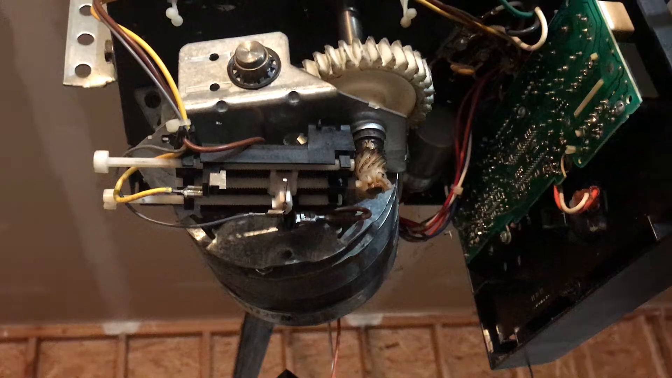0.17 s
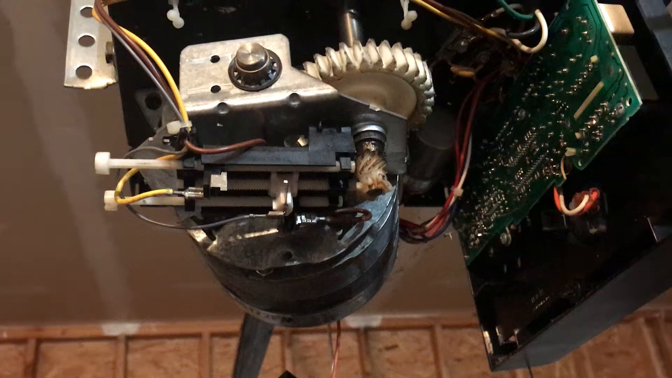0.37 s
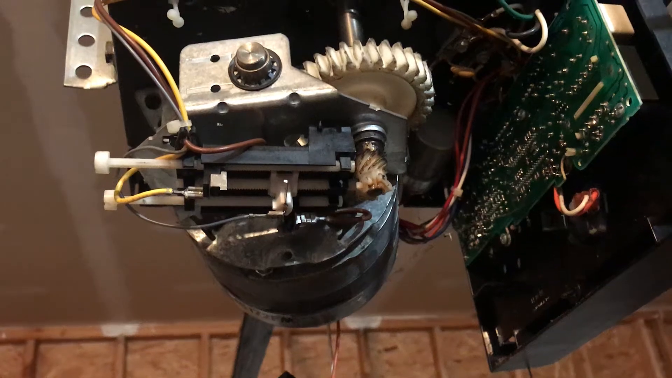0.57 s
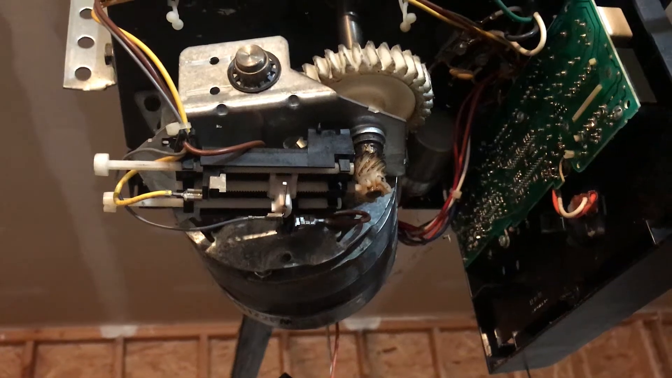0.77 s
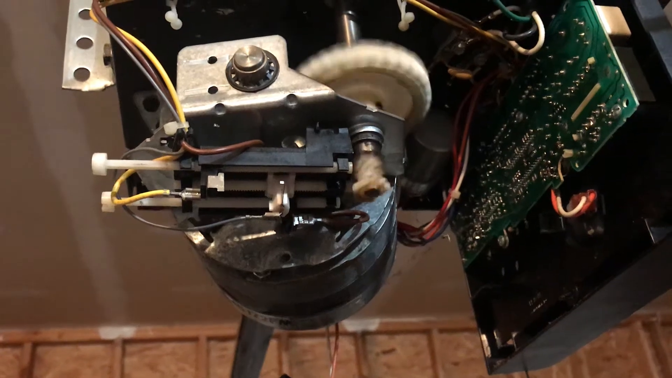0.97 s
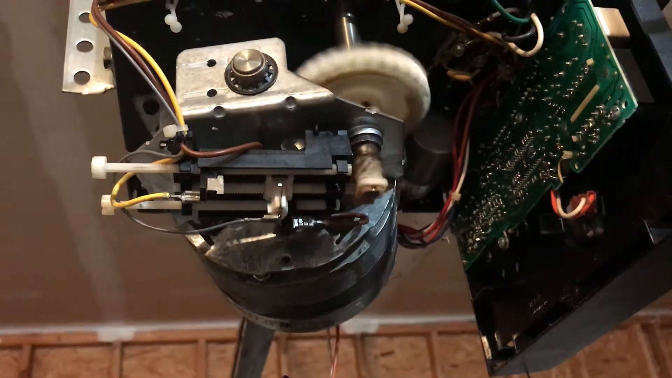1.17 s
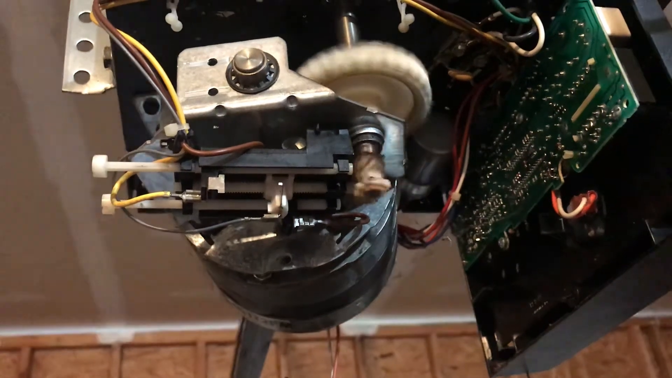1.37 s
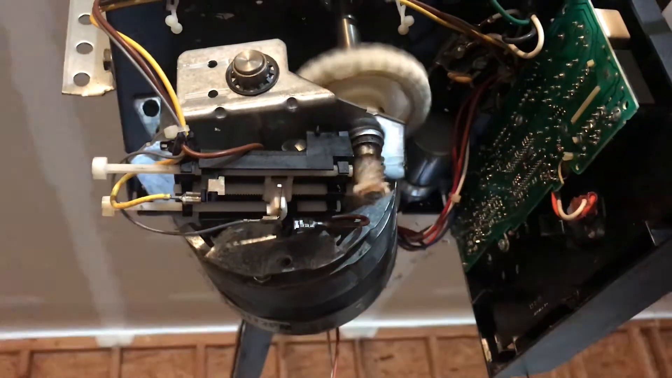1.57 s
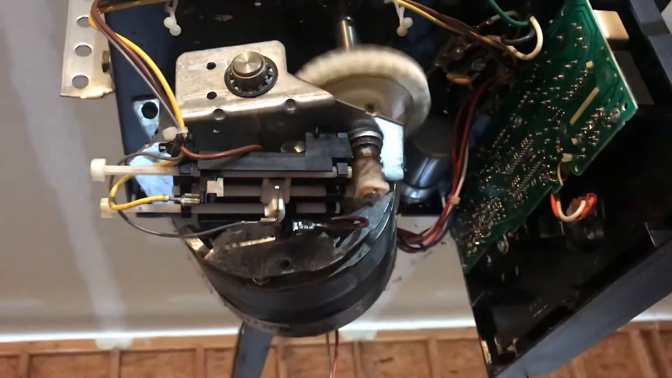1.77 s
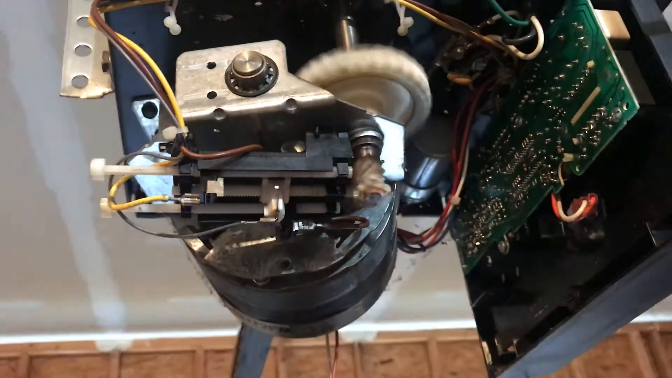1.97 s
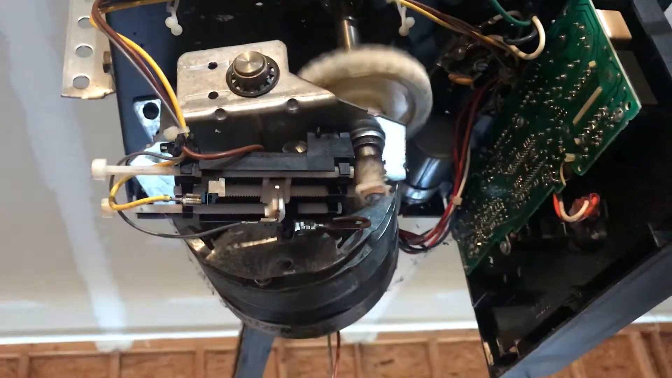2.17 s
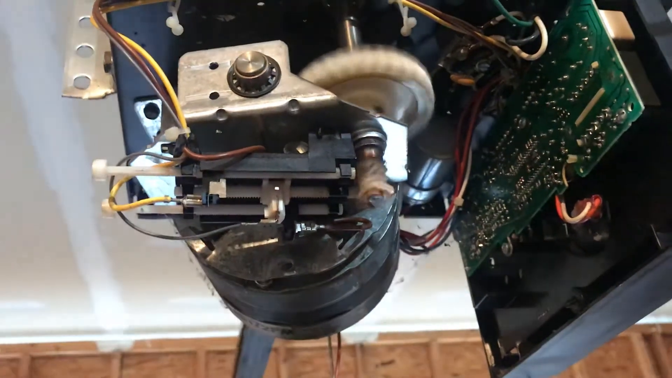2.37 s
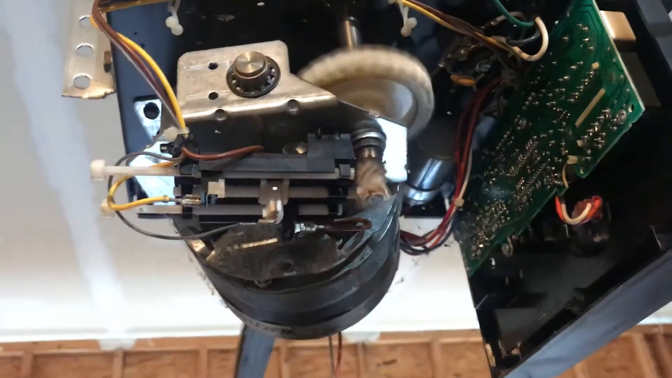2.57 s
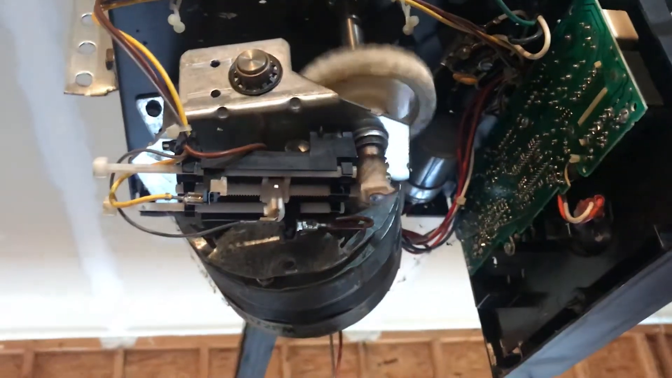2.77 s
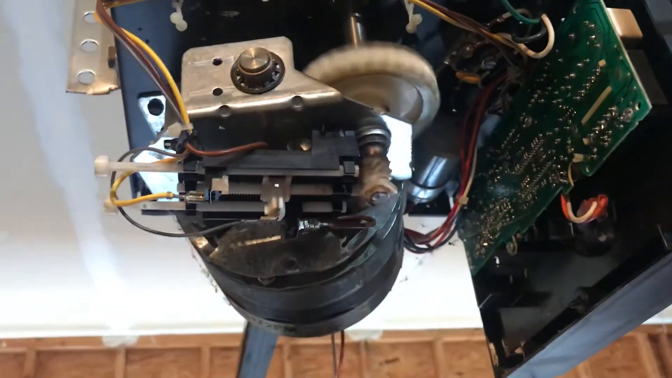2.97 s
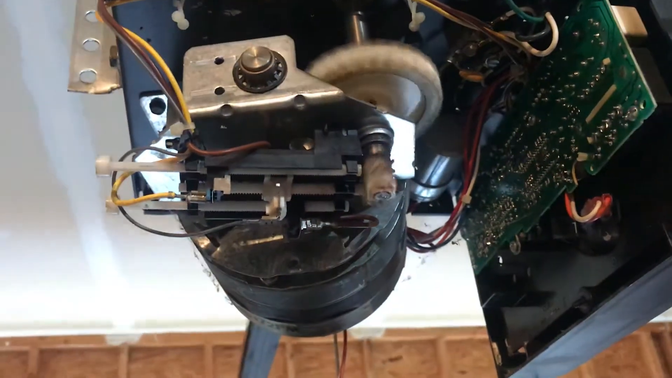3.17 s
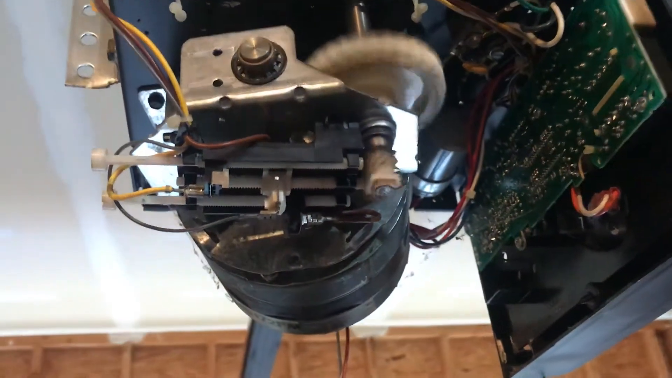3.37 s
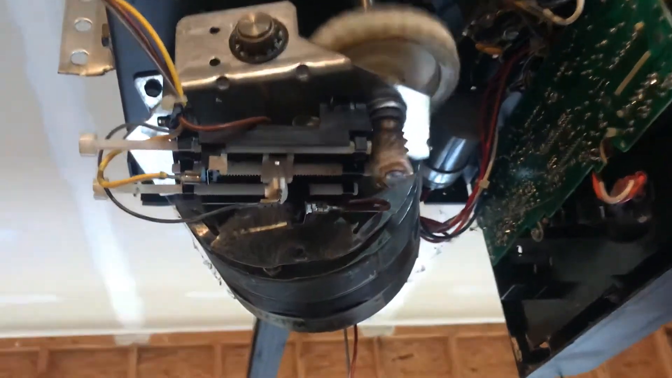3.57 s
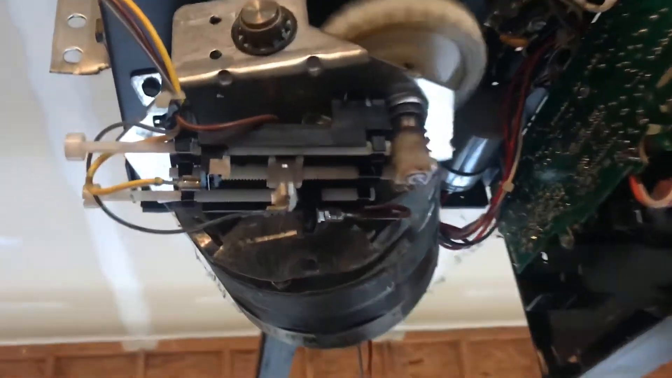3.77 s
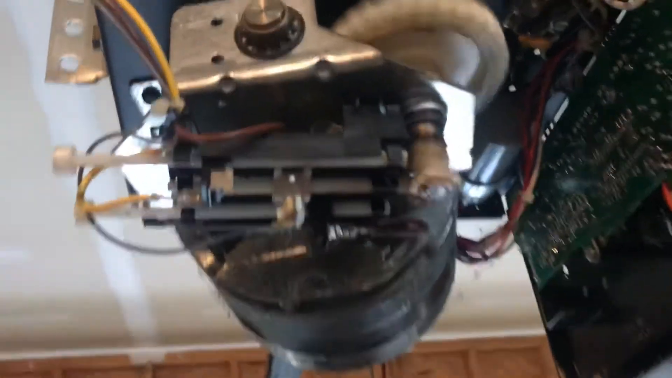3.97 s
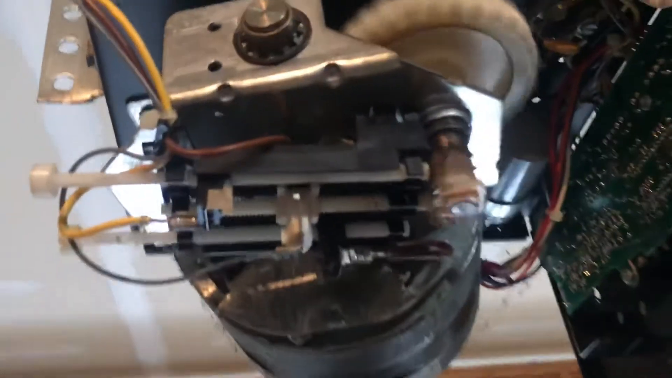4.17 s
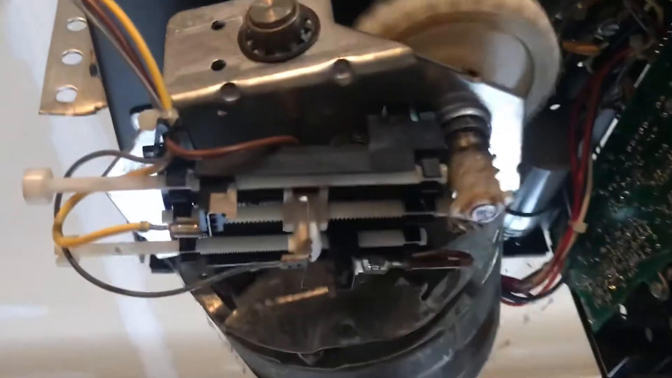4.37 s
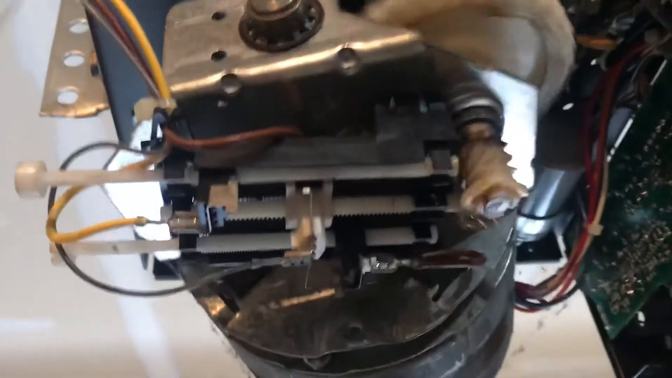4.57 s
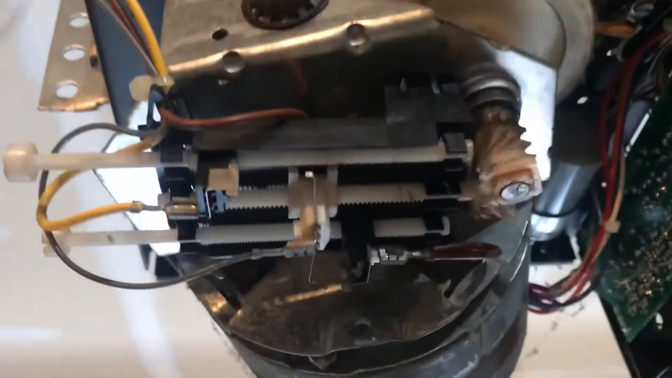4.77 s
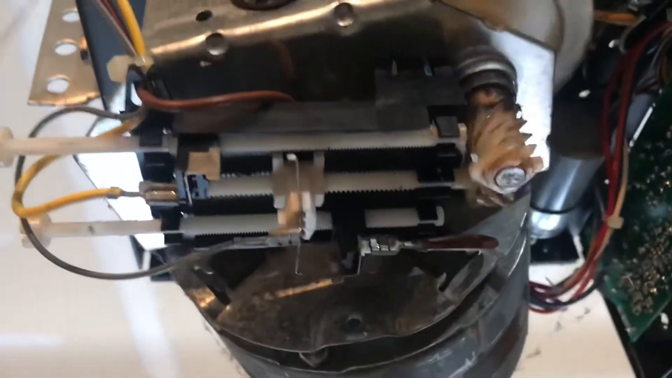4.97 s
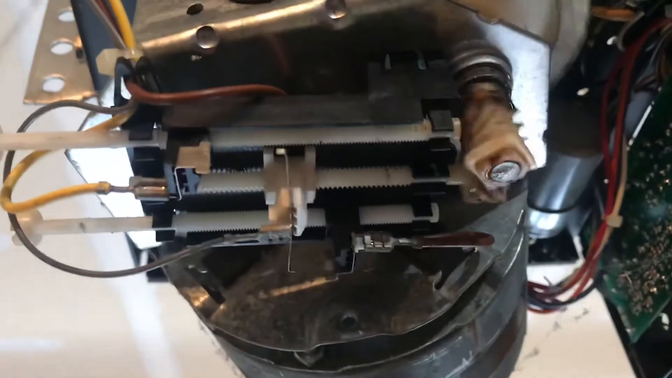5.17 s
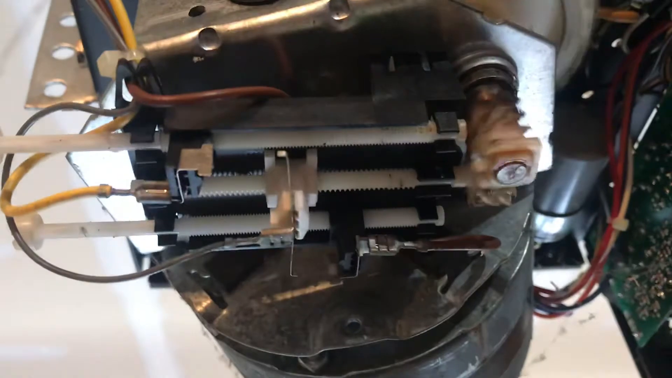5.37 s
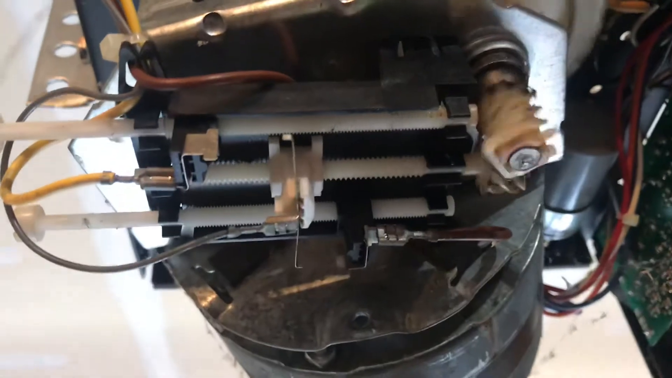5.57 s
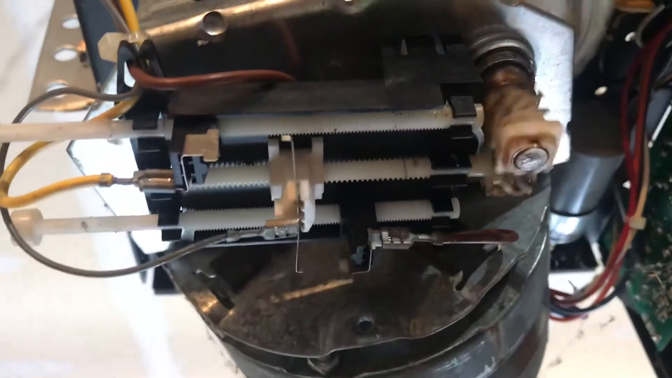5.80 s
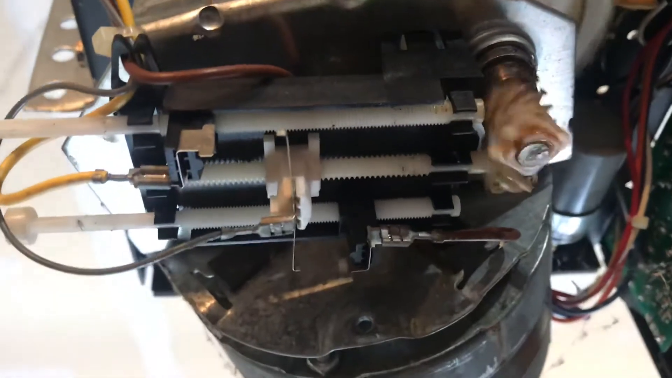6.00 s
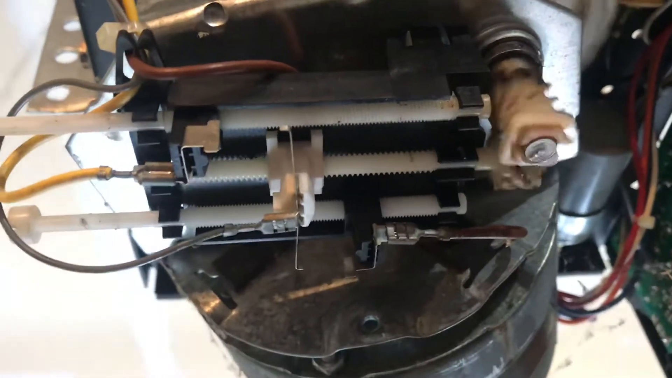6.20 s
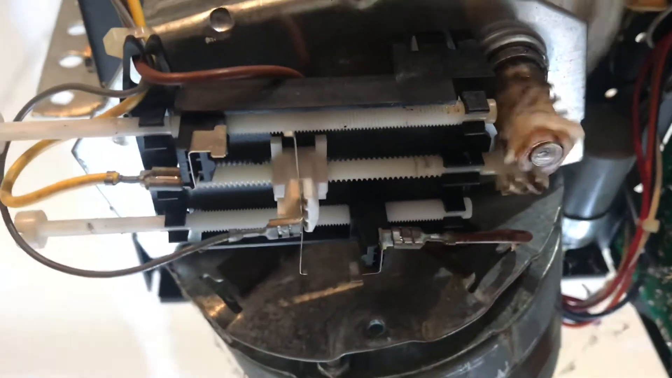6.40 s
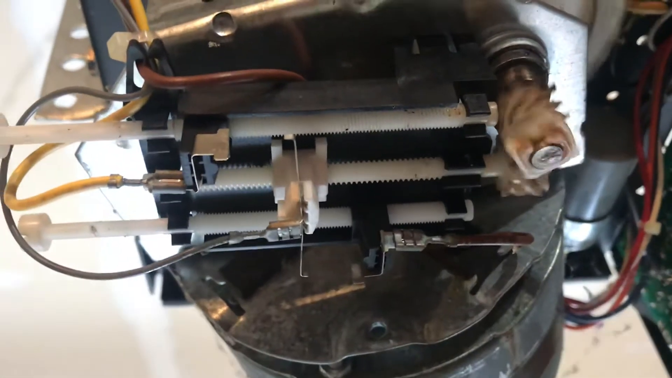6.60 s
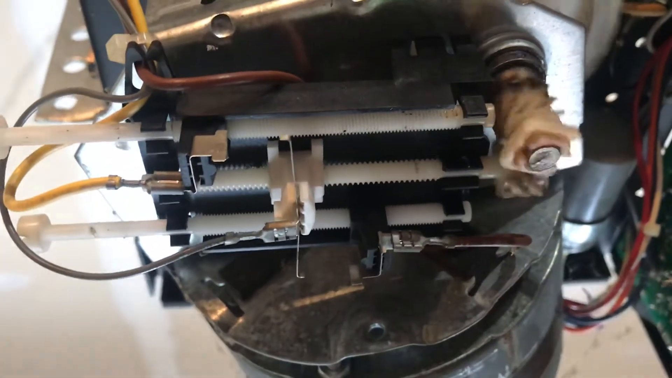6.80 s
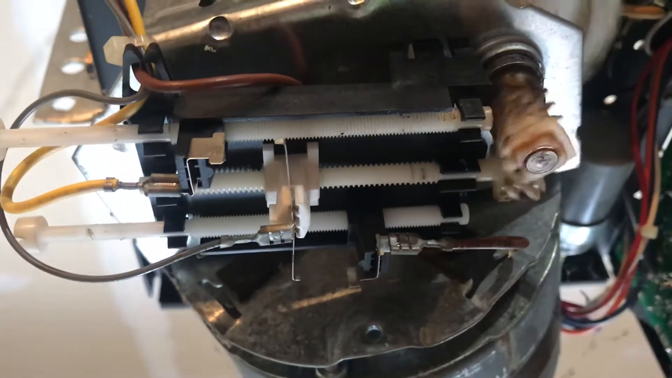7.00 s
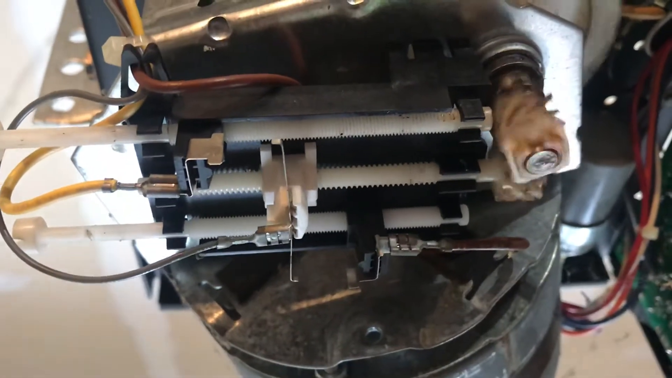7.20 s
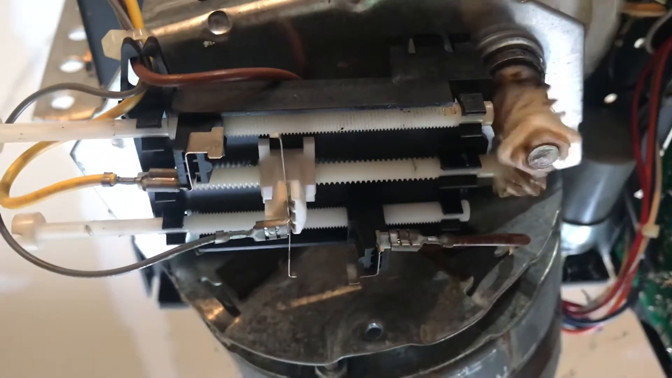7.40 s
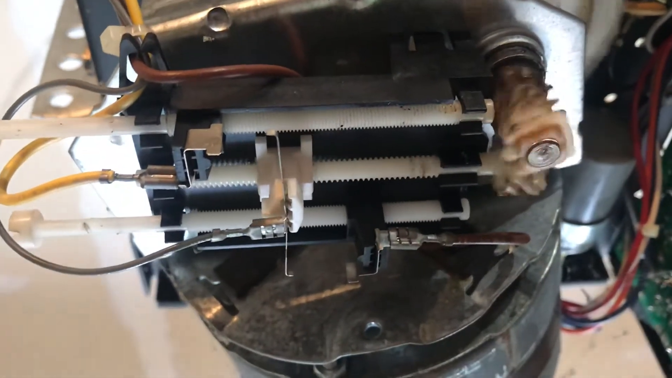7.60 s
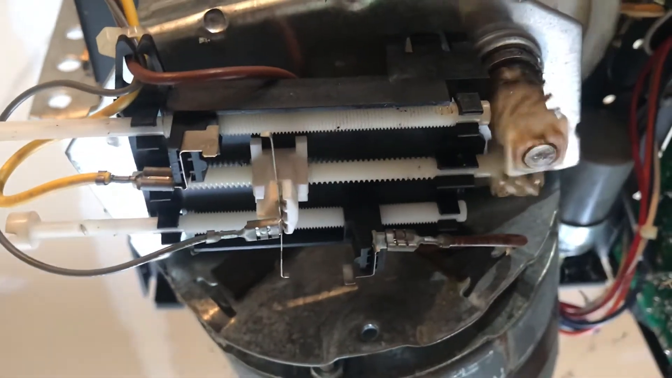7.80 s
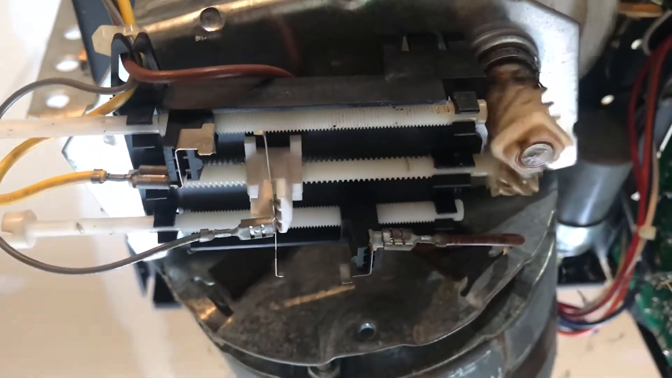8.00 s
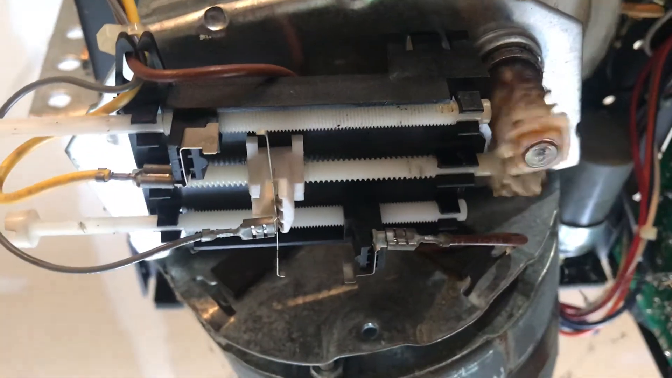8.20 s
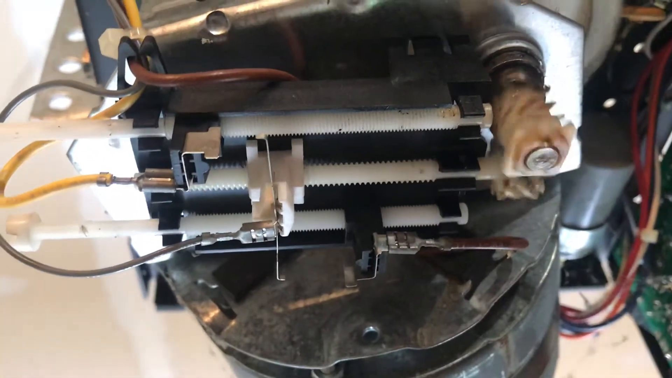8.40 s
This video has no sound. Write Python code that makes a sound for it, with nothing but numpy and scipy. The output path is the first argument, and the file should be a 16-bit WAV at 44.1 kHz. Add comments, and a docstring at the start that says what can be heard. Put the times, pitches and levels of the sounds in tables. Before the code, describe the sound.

An opened garage door drive runs close to the microphone in a small echoing garage. A brief hush ends with a hard electrical click, a cluster of dull knocks and ringing metal, then continuous motor hum, rapid worm-gear whine and friction noise, ticking about twice a second. Halfway the sound comes nearer and brighter, and metal clanks, scrapes and low groans interrupt it. The motor is still running at the end.

```python
"""After a moment of silence the still air of a garage opens up, and a relay snaps just above the microphone.
A garage door opener with its cover off takes up its slack in a few clanks and hauls the door along.
The motor hums in steady and shaft-locked lines; its worm gear whines in a burst each turn, from close tones beating.
Rubbing is shaped noise; ticks, knocks and clanks are noise bursts, the clanks with ringing steel; the door groans.
The microphone sits under the gears and moves closer halfway through; the garage answers the hits."""
import sys
import numpy as np
from scipy import signal
from scipy.fft import rfft, irfft, next_fast_len
from scipy.io import wavfile
from scipy.ndimage import uniform_filter1d

SR = 44100
rng = np.random.default_rng(int(sys.argv[2]) if len(sys.argv) > 2 else 0)


def master(y):
    """Save y as 16-bit WAV."""
    cut = np.clip(np.atleast_2d(y).T, -1, 1)
    pcm = np.round(cut * 32767)  # scale
    wavfile.write(sys.argv[1], SR, pcm.astype(np.int16))


N = 372644
TIME = np.arange(N) / SR
START_S = 0.869  # the motor is switched on

# Steady motor speed under the door's changing weight. Each row: time in s, speed in turns a second.
SHAFT_SPEED = [(1.2, 27.52), (3.9, 27.87), (4.15, 28.07), (4.5, 27.75), (5.4, 27.73), (6.17, 28.22),
               (6.8, 27.56), (8.45, 27.59)]
# Tugs that set the door bouncing on the drive. Each row: start in s, swing of the speed in turns a second.
TUGS = [(1.185, .59), (3.557, .25), (4.493, .34), (6.753, .46)]
BOUNCE_HZ, BOUNCE_DECAY_S = 2.0, 0.7
# Speed with no load, and the sag at which the gear teeth bear fully, both in turns a second.
FREE_SPEED, BEARING_SAG = 28.3, 0.25
# How near the microphone is to the gears. Each row: time in s, nearness from 0 (far) to 1 (near).
NEARNESS = [(3.6, 0.43), (4.5, 0.9), (6.8, 1)]

# Steady magnetic hum: frequencies in Hz, then their levels in dB from afar and from near.
HUM_HZ = (120, 240, 600, 720, 840, 960, 1080)
HUM_FAR_DB = (-56, -47, -55, -55, -47.5, -58.5, -59)
HUM_NEAR_DB = (-53, -46, -51, -51.5, -49, -43, -53)
# Rotor lines shifted by the magnetic pull. Each row: multiple of the shaft speed, shift in Hz.
SLOT_LINES = ((36, -120), (36, 120), (49, -120), (50, -120))
# Levels of the rotor lines from afar, in dB.
SLOT_FAR_DB = (-57, -58, -56, -57)
# Multiples of the shaft speed: the shake of the whole unit, then the drone of a panel.
SHAKE_ORDERS = (2, 7)
# Shake with the teeth bearing fully: level from afar, change from near, in dB.
SHAKE_FAR_DB, SHAKE_NEAR_DB = -37, -6.5
# Drone: level at no-load speed in dB, and its fall in dB per turn a second of sag.
DRONE_DB, DRONE_FALL_DB = -43.5, 19
# Lines of the worm gear's whine: multiples of the shaft speed.
WHINE_ORDERS = (47, 48, 49, 50, 51)
# Levels of the whine lines from afar with the teeth bearing fully, in dB.
WHINE_FAR_DB = (-56, -50, -44.5, -43.5, -55)
WHINE_NEAR_DB = 1  # lift of the whine from near

# Bands of running noise: rumble, gear rub and hiss.
# Each row: low edge in Hz, high edge in Hz, level from afar in dB, lift from near in dB, lift under strain in dB.
RUNNING_BANDS = [(54, 410, -46, 2.5, 7.5), (442, 1940, -46.5, 9, 0.5), (2050, 23000, -48, 5.5, 4)]
# Colour of the rubbing. Each row: frequency in Hz, gain in dB.
RUB_COLOUR = [(24, -28), (40, 1), (166, -8), (242, -9), (453, -18), (596, -9.5), (1170, -6), (1360, -7.5),
              (1620, -14.5), (3800, -18.5), (11100, -28.5), (15800, -34.5)]
# Resonances and dips of the chassis. Each row: centre in Hz, width in Hz, lift from afar in dB, lift from near in dB.
CHASSIS = [(641, 72, 4.5, 3.5), (1490, 120, 1.5, 1), (1788, 68, -2.5, 7.5), (2664, 76, 2, 7),
           (3380, 480, -11.5, -2.5), (3740, 550, 14, 4.5), (4950, 210, -10, -2), (5810, 500, -2, 3.5),
           (7540, 340, -10, -4), (8000, 410, 3, -1.5), (10200, 340, -5, -3.5), (11370, 1300, 6.5, 4)]
# Strain as the door breaks away and as it rounds the bend of the track.
# Each row: middle in s, half length in s, strength from 0 to 1.
STRAINS = [(1.092, 0.14, 0.83), (6.66, 0.46, 0.58)]

# The relay: its armature stirs, then the contacts close. Each row: start in s, peak level in dB.
RELAY_CLICKS = [(0.805, -58), (0.823, -57), (0.8838, -15.5), (0.8865, -19.5)]
# Colour of the relay. Each row: frequency in Hz, level in dB per Hz.
RELAY_COLOUR = [(180, -62), (300, -28), (1040, -8), (1310, -22), (1830, -11), (2770, -6), (4870, -3.5),
                (12900, -5.5), (15800, -11)]
# Clanks of the drive and door. Each row: start in s, strike level in dB, body tilt in dB, brightness tilt in dB.
CLANKS = [(1.0186, -21.5, -16, 0.5), (1.0411, -17, -7, 0.5), (1.0756, -23, -9, -5), (1.1215, -23.5, 6, 4),
          (1.1796, -19.5, -25, 2), (5.9209, -23.5, -4.5, -2.5), (6.0081, -24.5, 5, -4),
          (6.338, -19.5, -9, -7), (6.5793, -15.5, -3.5, 5)]
# Colour of a clank before its tilts. Each row: frequency in Hz, gain in dB.
CLANK_COLOUR = [(88, -23), (150, -3.5), (699, -2), (1440, 1.5), (3460, -10.5), (3960, -6), (5000, -23.5),
                (8470, -15.5), (15800, -41.5)]
# Modes of the steel frame before tilt and chance. Each row: frequency in Hz, relative level in dB, t60 in s.
STEEL_MODES = [(1409, 5, 0.11), (1570, -4, 0.16), (1915, -4, 0.15), (2370, -9.5, 0.16), (3067, 0.5, 0.068),
               (4160, -16, 0.054), (5710, -3.5, 0.073), (8200, -15, 0.042)]
REBOUND_S, REBOUND_DB = 0.0215, -9.5  # every clank rebounds once: delay, level against the first blow
# Hard dull knocks of the chain and rollers. Each row: start in s, peak level in dB.
KNOCKS = [(0.9085, -24), (0.9315, -24), (0.942, -17), (1.2335, -27.5), (3.965, -28.5), (4.076, -21),
          (4.465, -28.5), (5.7749, -20)]
# Worm turns to one revolution of the big gear; first tick in s; middle level of a tick in dB.
GEAR_RATIO, FIRST_TICK_S, GEAR_TICK_DB = 16, 1.764, -30.5
# As the load eases, the gear runs ahead through its play: time in s, distance in worm turns.
PLAY_S, PLAY_TURNS = 5.5, 0.72
# Colour of ticks and knocks. Each row: frequency in Hz, level in dB per Hz.
TICK_COLOUR = [(300, -23), (1000, 4), (1800, 10.5), (2450, -2.5), (3100, 7.5), (4200, -5), (6000, -17),
               (15000, -40)]
# Small bright snaps in the gear housing. Each row: start in s, peak level in dB.
SNAPS = [(1.5593, -39), (2.9507, -34), (3.8924, -32), (6.5504, -37), (6.6923, -31), (6.8414, -34),
         (6.912, -23), (7.1797, -33)]
# Colour of a snap. Each row: frequency in Hz, level in dB per Hz.
SNAP_COLOUR = [(400, -5), (2000, 1), (5000, -1.5), (8000, -2.5), (11500, -4.5), (15500, -7)]
# Shudder and grind at the start, then a thin squeal, scrapes and groans.
# Each row: middle in s, length in s, centre in Hz, width in Hz, level in dB.
GROANS = [(0.975, 0.14, 58, 25, -30.5), (1.083, .17, 1550, 2360, -35), (1.239, 0.15, 86, 40, -36.5),
          (4.2, 0.78, 10900, 480, -57), (3.95, .14, 2400, 2000, -46.5), (4.819, .14, 1090, 1800, -39.5),
          (5.013, 0.15, 542, 90, -39.5), (5.723, 0.13, 220, 41, -41), (5.83, 0.29, 857, 130, -38),
          (6.488, 0.077, 1930, 1600, -33.5), (6.678, 0.061, 4480, 9000, -43), (6.789, .14, 1800, 2600, -40),
          (6.943, 0.12, 1200, 2320, -34.5), (7.572, 0.31, 164, 79, -41)]

# Decay of the garage's reflections. Each row: frequency in Hz, t60 in s.
GARAGE_DECAY = [(100, 1), (1000, 0.22), (4000, 0.15), (15000, 0.38)]
# Colour of the still garage air. Each row: frequency in Hz, level in dB per Hz before levelling.
AIR_COLOUR = [(15, -43), (25, -35), (43, 0), (64, 2), (112, -9.5), (515, -28), (1120, -29), (2180, -35),
              (15000, -45.5)]
AIR_DB = -54.5
BAND_LIMIT_HZ = 15850


def shaft_speed():
    """The steady speed in turns a second, with a dying swing after every tug of the door."""
    speed = along(SHAFT_SPEED)
    for start, swing in TUGS:
        t = np.maximum(TIME - start, 0)
        speed = speed - swing * np.sin(2 * np.pi * BOUNCE_HZ * t) * np.exp(-t / BOUNCE_DECAY_S)
    return speed


def bearing(sag):
    """How firmly the gear teeth bear, 0-1: they go slack when the load lets the motor run free."""
    return np.clip(sag / BEARING_SAG, 0, 1)


def motor(turns, sag, near):
    """Mains hum stays at fixed pitch; rotor slot lines, shake and panel drone follow the shaft."""
    hum = np.zeros(N)
    for hz, far_db, near_db in zip(HUM_HZ, HUM_FAR_DB, HUM_NEAR_DB):
        level = far_db + near ** 2 * (near_db - far_db)
        hum += tone(hz * TIME + rng.random(), level, waver_db=0.45, jitter=0.39)
    slots = np.zeros(N)
    for (order, shift_hz), db in zip(SLOT_LINES, SLOT_FAR_DB):
        slots += tone(order * turns + shift_hz * TIME, db + 5 * near, waver_db=0.5, jitter=0.12)
    shake_order, drone_order = SHAKE_ORDERS
    shake = tone(shake_order * turns, SHAKE_FAR_DB + SHAKE_NEAR_DB * near, waver_db=0.5, jitter=0.16)
    drone = tone(drone_order * turns, DRONE_DB - DRONE_FALL_DB * sag, waver_db=2, jitter=0.25)
    shaft_lines = slots + bearing(sag) * shake + drone
    return hum * spun_up(0.011, 0.037) + shaft_lines * spun_up(0.21, 0.16)


def whine(turns, sag, near):
    """Neighbouring orders swell together, so the worm gear sings once a turn; load lowers and roughens it."""
    slip = 0.034 * sag * drift(40)  # in cycles, shared by all orders
    song = np.zeros(N)
    for order, db in zip(WHINE_ORDERS, WHINE_FAR_DB):
        song += tone(order * turns + slip, db, waver_db=1.0, jitter=0.29)
    flutter_db = 1.37 * drift(28)
    return song * bearing(sag) * amp(WHINE_NEAR_DB * near + flutter_db) * spun_up(0.043, 0.27)


def through_chassis(grains, sheet, column):
    """Friction rings the sheet metal and chassis, heard from one microphone distance (a CHASSIS column)."""
    def gain_db(f):
        """Rub colour, small resonances and the broad lifts and dips."""
        lifts = sum(row[column] * np.exp(-2 * ((f - row[0]) / row[1]) ** 2) for row in CHASSIS)
        return read(RUB_COLOUR, f) + read(sheet, f) + lifts

    return shaped(grains, gain_db)


def rubbing(turns, near):
    """Gear and chain friction: rough spots return each turn; louder from near and under strain."""
    rough_spots = evened(rng.standard_normal(28))
    spots = np.interp(turns % 1, np.linspace(0, 1, 28), rough_spots)
    unevenness_db = 0.25 * spots + 1.17 * drift(500) + 0.78 * drift(22)
    grains = rng.standard_normal(N) * amp(unevenness_db)
    sheet = ripple(spacing_hz=70, depth_db=1.5)
    afar = through_chassis(grains, sheet, column=2)
    close = through_chassis(grains, sheet, column=3)
    noise = (1 - near) * afar + near * close
    strain = sum(strength * np.exp(-((TIME - s) / half) ** 2) for s, half, strength in STRAINS)
    rumble, gears, hiss = (band(noise, low, high) * amp(db + near_db * near + strain_db * strain)
                           for low, high, db, near_db, strain_db in RUNNING_BANDS)
    return (rumble * amp(0.56 * drift(12)) + gears + hiss) * spun_up(0, 0.028)


def gear_ticks(turns):
    """One tick for each revolution of the big gear, as rows of start in s, peak level in dB."""
    since_first = turns - np.interp(FIRST_TICK_S, TIME, turns)
    revolutions = (since_first + PLAY_TURNS * (TIME > PLAY_S)) / GEAR_RATIO
    times = np.interp(np.arange(int(revolutions[-1]) + 1), revolutions, TIME)
    return [(s, GEAR_TICK_DB + rng.standard_normal()) for s in times]


def burst(crack_t60, rattle_db, rattle_t60):
    """Parts meet in a sharp crack, then a weaker, lumpy rattle; both are decaying noise."""
    t = np.arange(SR // 2) / SR
    crack = 1000 ** (-t / crack_t60)
    rattle = amp(rattle_db + 2.26 * drift(317, size=len(t))) * 1000 ** (-t / rattle_t60)
    return rng.standard_normal(len(t)) * np.hypot(crack, rattle)


def clicks(rows, colour, crack_t60, rattle_db, rattle_t60):
    """Short hits that share one colour, each a fresh burst."""
    out = np.zeros(N)
    for s, db in rows:
        hit = coloured(burst(crack_t60, rattle_db, rattle_t60), lambda f: read(colour, f))
        add(out, s, amp(db) * peaked(hit))
    return out


def blow(body_db, bright_db):
    """Steel parts knock and rattle; each blow lands elsewhere and weights the modes anew."""
    t = np.arange(SR // 2) / SR
    tilt = [(1100, body_db), (2500, 0), (4500, 0), (8000, bright_db)]  # Hz, dB
    spot = ripple(spacing_hz=140, depth_db=3.5)
    knock = burst(crack_t60=0.026, rattle_db=-5, rattle_t60=0.12)
    hit = peaked(coloured(knock, lambda f: read(CLANK_COLOUR, f) + read(tilt, f) + read(spot, f)))
    ring = np.zeros(len(t))
    for hz, db, t60 in STEEL_MODES:
        level = db + read(tilt, hz) + 4.2 * rng.standard_normal()
        ring += amp(level - 60 * t / t60) * np.sin(2 * np.pi * (hz * t + rng.random()))
    return (hit + amp(-6.5) * peaked(ring)) * np.minimum(t / 0.0011, 1)


def clanks():
    """Each clank is a blow of steel on steel and its weaker rebound."""
    out = np.zeros(N)
    for s, db, body_db, bright_db in CLANKS:
        add(out, s, amp(db) * blow(body_db, bright_db))
        add(out, s + REBOUND_S, amp(db + REBOUND_DB) * blow(body_db, bright_db))
    return out


def groans():
    """Each is a band of uneven friction that swells and fades."""
    out = np.zeros(N)
    for s, length, hz, width, db in GROANS:
        fuzz = shaped(rng.standard_normal(SR), lambda f: -10 * np.log10(1 + (2 * (f - hz) / width) ** 6))
        fuzz = fuzz * amp(2.7 * drift(44.4, size=SR))
        swell = signal.windows.cosine(min(int(length * SR), SR))
        add(out, s - length / 2, amp(db) * evened(swell * fuzz[:len(swell)]))
    return out


def garage(x):
    """Diffuse reflections, starting 6 ms late: the bass lingers and the upper middle dies first."""
    taps = rng.standard_normal(SR // 2) * (np.arange(SR // 2) > SR * 0.006)
    hz, t, z = signal.stft(taps, SR, nperseg=256)
    decay_db = -60 * t / read(GARAGE_DECAY, hz)[:, None]
    tail = signal.istft(z * amp(decay_db), SR, nperseg=256)[1]
    return signal.fftconvolve(x, tail / np.linalg.norm(tail))[:N]


def still_air():
    """The quiet garage behind everything: steady noise, strongest in the bass."""
    return amp(AIR_DB) * evened(shaped(rng.standard_normal(N), lambda f: read(AIR_COLOUR, f)))


def amp(db):
    """Decibels to gain."""
    return 10 ** (np.asarray(db) / 20)


def evened(x):
    """Scales to rms 1."""
    return x / np.sqrt(np.mean(x ** 2) + 1e-20)


def peaked(x, size=128):
    """Scales a hit so that its loudest 3 ms have rms 1."""
    return x / np.sqrt(uniform_filter1d(x ** 2, size).max())


def along(rows):
    """A curve of rows (s, value), read at every sample."""
    return np.interp(TIME, *np.transpose(rows))


def read(points, hz):
    """A spectrum, joined on a log-frequency axis."""
    f, value = np.transpose(points)
    return np.interp(np.log(hz + 1), np.log(f + 1), value)


def shaped(x, db_at):
    """Filters a long sound by a gain in dB that is a function of frequency."""
    size = next_fast_len(len(x))
    return irfft(rfft(x, size) * amp(db_at(np.fft.rfftfreq(size, 1 / SR))), size)[:len(x)]


def coloured(x, db_at, size=2048):
    """Filters a hit causally (minimum phase), so that its attack stays sharp."""
    gain_db = np.maximum(db_at(abs(np.fft.fftfreq(size, 1 / SR))), -100)
    log_gain = np.log(amp(gain_db))
    taps = np.fft.ifft(np.exp(np.conj(signal.hilbert(log_gain)))).real
    return signal.fftconvolve(x, taps)[:len(x)]


def band(x, low_hz, high_hz):
    """One band at rms 1, with soft edges."""
    def gain_db(f):
        """Rolls off below the low edge and above the high edge."""
        return -10 * np.log10((1 + (low_hz / (f + 1)) ** 8) * (1 + (f / high_hz) ** 8))

    return evened(shaped(x, gain_db))


def ripple(spacing_hz, depth_db):
    """The many small resonances of sheet metal, as a random spectrum of rows (Hz, dB)."""
    values = rng.standard_normal(1024)
    return np.c_[np.arange(len(values)) * spacing_hz, depth_db * values]


def drift(rate_hz, size=N):
    """Random wandering of rms 1, with a new target at the given rate."""
    knots = rng.standard_normal(8192)
    return evened(np.interp(np.arange(size) / SR * rate_hz, np.arange(len(knots)), knots))


def tone(cycles, db, waver_db, jitter):
    """A line whose level (dB) and phase (radians) waver a little."""
    level = np.sqrt(2) * amp(db + waver_db * drift(5))
    return level * np.cos(2 * np.pi * cycles + jitter * drift(25))


def spun_up(delay, rise):
    """Goes from 0 to 1 after the motor is switched on; delay and rise in s."""
    return np.clip((TIME - START_S - delay) / rise, 0, 1)


def add(mix, s, sound):
    """Adds a sound at time s."""
    part = mix[max(round(s * SR), 0):][:len(sound)]
    part += sound[:len(part)]


def scene():
    """The drive, its hits with their echo, and the still air of the garage."""
    speed, near = shaft_speed(), along(NEARNESS)
    turns = np.cumsum(speed) / SR + 0.58
    sag = FREE_SPEED - speed
    drive = motor(turns, sag, near) + whine(turns, sag, near) + rubbing(turns, near)
    relay = clicks(RELAY_CLICKS, RELAY_COLOUR, crack_t60=0.026, rattle_db=-26, rattle_t60=0.14)
    ticks = clicks(KNOCKS + gear_ticks(turns), TICK_COLOUR, crack_t60=0.015, rattle_db=-12.5, rattle_t60=0.091)
    snaps = clicks(SNAPS, SNAP_COLOUR, crack_t60=0.018, rattle_db=-12, rattle_t60=0.15)
    steel = clanks()
    echo = garage(amp(-17.0) * relay + amp(-12.0) * (steel + ticks + snaps))
    return (drive + relay + steel + ticks + snaps + groans() + echo + still_air())[None]


def record(dry):
    """The microphone opens after a moment and thins the deep bass; then the treble is band-limited."""
    opened = np.clip((TIME - 0.118) / 0.005, 0, 1)
    bass_cut = signal.butter(3, 43, "highpass", fs=SR, output="sos")
    thinned = signal.sosfilt(bass_cut, dry * opened)
    treble_cut = signal.firwin(511, BAND_LIMIT_HZ, window=("kaiser", 9), fs=SR)
    return signal.oaconvolve(thinned, treble_cut[None], "same")


dry = scene()
out = record(dry)
master(out)
```